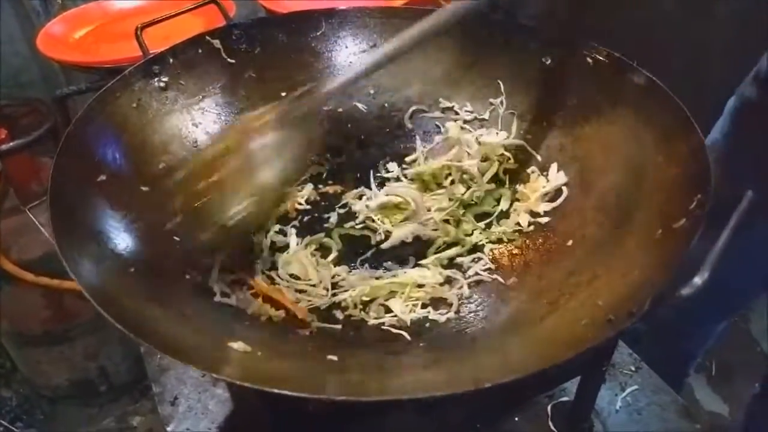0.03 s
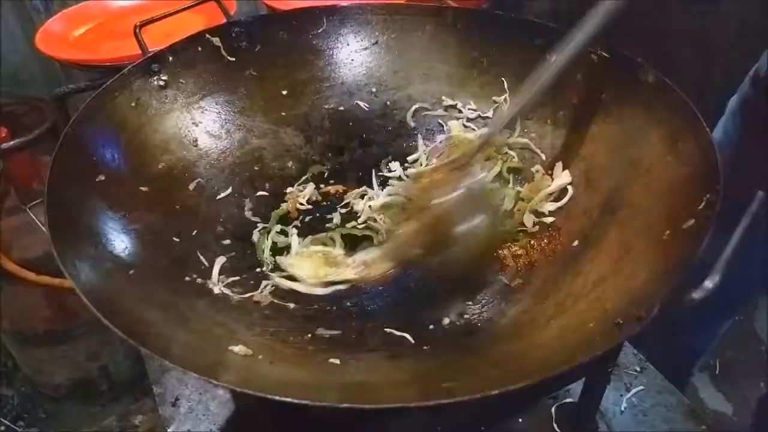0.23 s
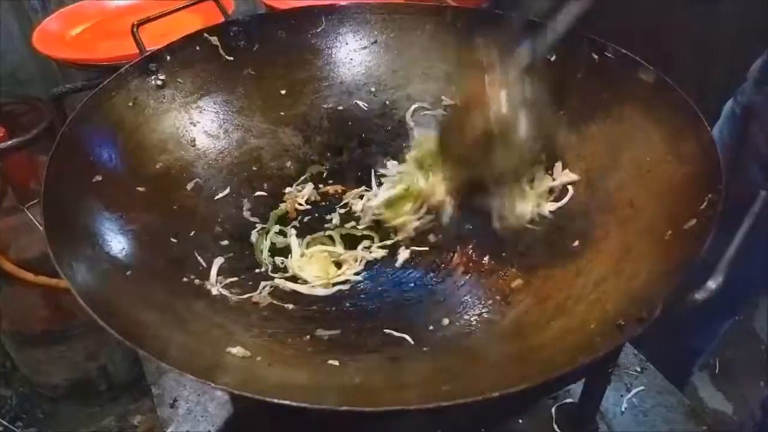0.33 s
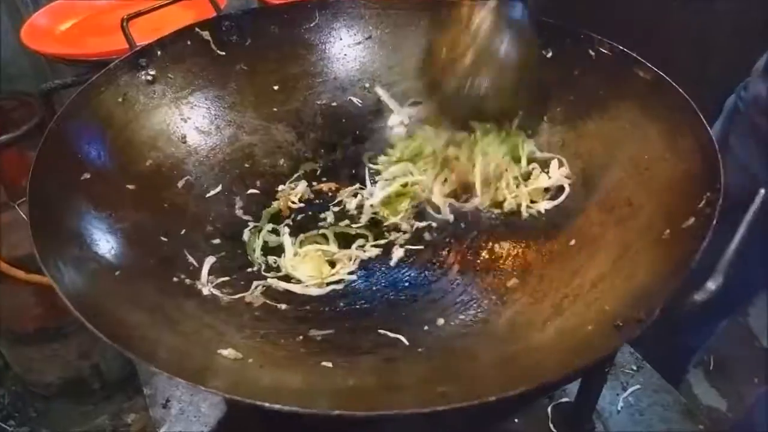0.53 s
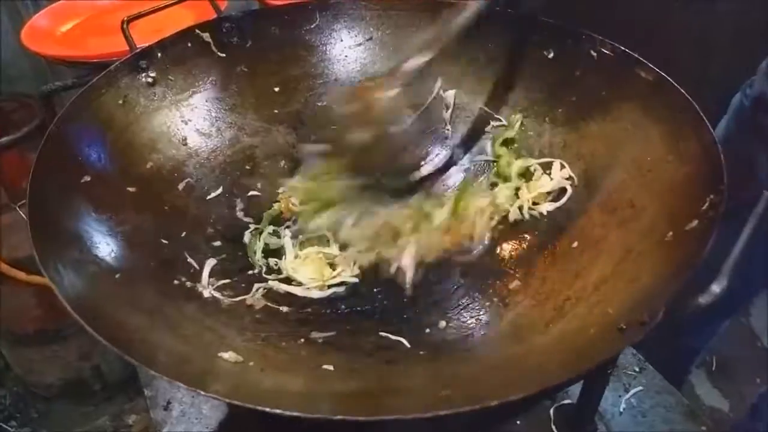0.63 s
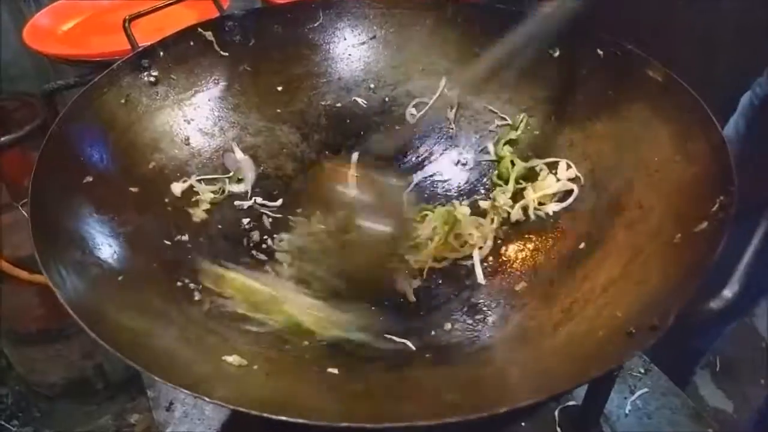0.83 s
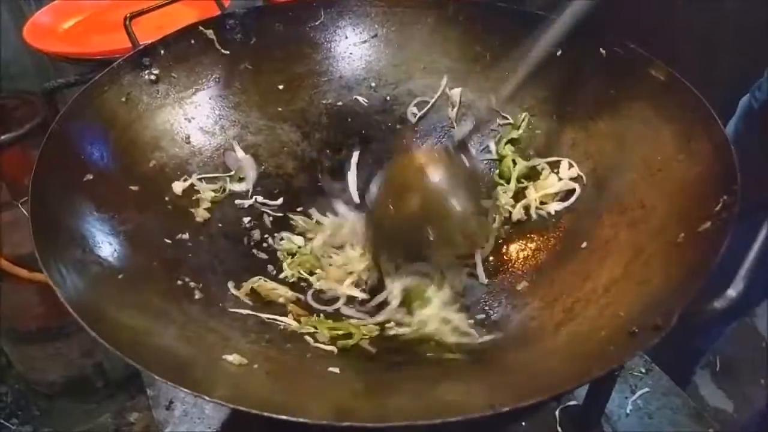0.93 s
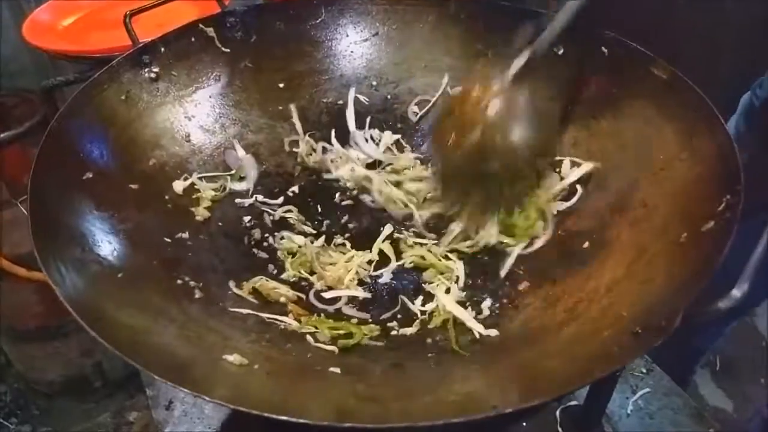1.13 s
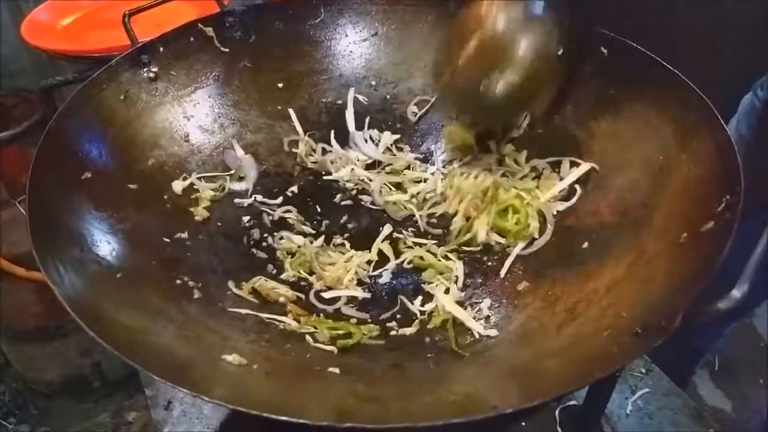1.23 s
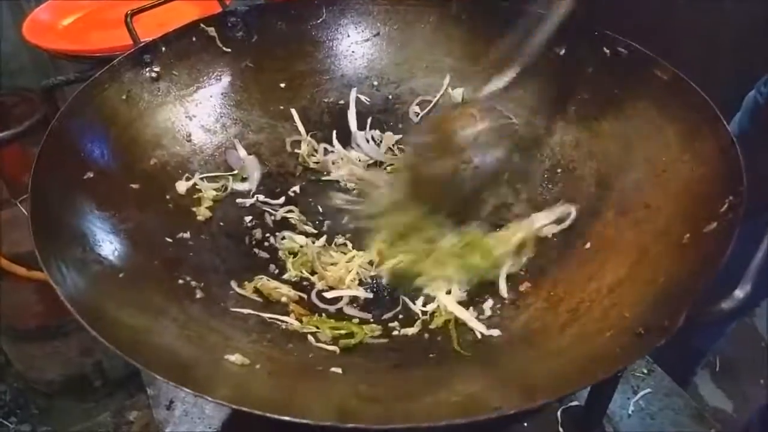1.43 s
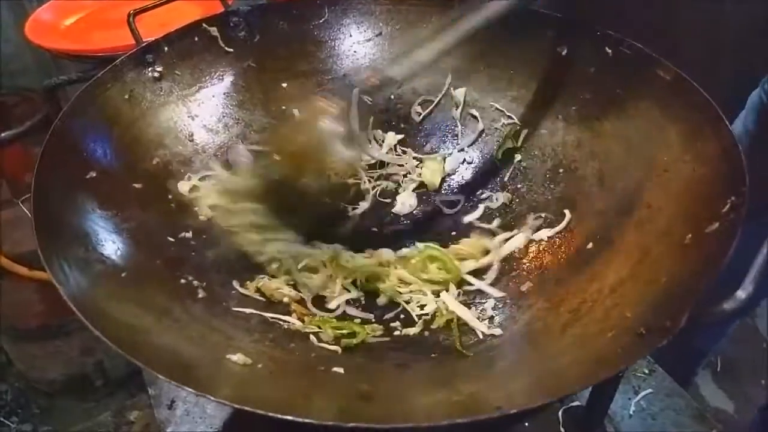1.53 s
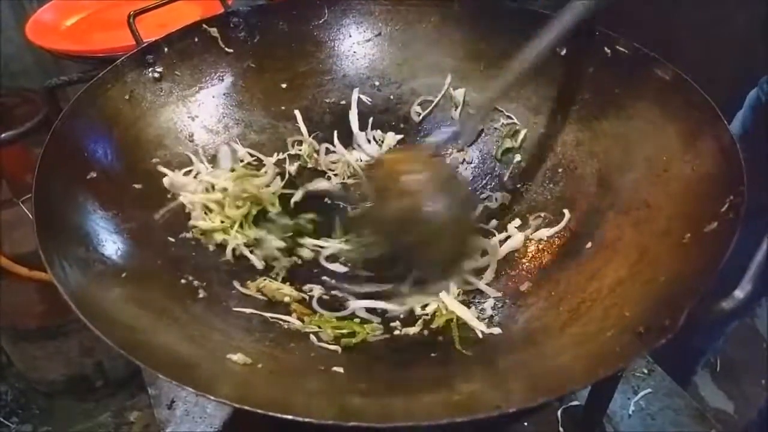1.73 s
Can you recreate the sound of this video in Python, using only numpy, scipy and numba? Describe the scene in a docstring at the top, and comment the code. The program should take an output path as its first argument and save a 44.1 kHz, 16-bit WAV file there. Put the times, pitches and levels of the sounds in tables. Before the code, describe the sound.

Vegetables sizzle in a steel wok over a rumbling gas burner. A metal ladle clatters, scrapes and squeaks against the pan, the hiss swells, then one hard knock briefly dips the volume before a last squeaky scrape.

```python
"""At a kitchen stove, shredded vegetables sizzle in a steel wok over a roaring gas burner.
Tiny bursts of steam make the hiss, and a few drops of oil spit. A stirring ladle chatters, scrapes
and squeaks on the pan and sets it ringing. One hard knock makes the automatic volume control turn
everything down. A stereo-widening effect hollows out a few narrow bands of pitch in the centre."""
import sys
import numpy as np
from scipy import signal
from scipy.fft import rfft, irfft, next_fast_len
from scipy.io import wavfile
from scipy.ndimage import uniform_filter1d
from numba import njit

SR = 44100
rng = np.random.default_rng(int(sys.argv[2]) if len(sys.argv) > 2 else 0)


def unload_audio(sound):
    """Save the sound as a 16-bit wav file, at the path given as the first command line argument."""
    columns = np.transpose(np.atleast_2d(sound))
    # keep every value between -1 and 1, then stretch to whole-number steps
    steps = np.round(np.clip(columns, -1, 1) * 32767)
    wavfile.write(sys.argv[1], SR, steps.astype(np.int16))


N = 79380
T = np.arange(N) / SR
FFT_SIZE = next_fast_len(2 * N)
FREQS = np.fft.rfftfreq(FFT_SIZE, 1 / SR)

def gain(db):
    """Turn decibels into a number to multiply a sound by."""
    return 10 ** (np.asarray(db) / 20)

def normalise(x):
    """Scale a signal to an average power of 1."""
    return x / np.sqrt(np.mean(x ** 2))

def gain_over_time(table, column):
    """Join one column of levels into a smooth volume curve."""
    rows = np.array(table)
    return gain(np.interp(T, rows[:, 0], rows[:, column]))

def gain_over_pitch(points):
    """Join (pitch_hz, level_db) points into a filter curve."""
    hz, db = np.array(points).T
    return gain(np.interp(np.log(FREQS + 1), np.log(hz), db))

def apply_filter(x, curve):
    """Turn each pitch up or down as the curve says."""
    cepstrum = irfft(np.log(curve + 1e-6), FFT_SIZE)
    # folding this in half keeps the filter from ringing before a sound starts
    cepstrum[1:FFT_SIZE // 2] *= 2
    cepstrum[FFT_SIZE // 2 + 1:] = 0
    return irfft(rfft(x, FFT_SIZE) * np.exp(rfft(cepstrum)), FFT_SIZE)[..., :N]

def colour(x, points):
    """Change the tone of a noise but keep its power."""
    return apply_filter(x, normalise(gain_over_pitch(points)))

def wander(per_s):
    """A smooth random drift, typically between -1 and 1."""
    hold = int(SR / per_s)
    steps = np.repeat(rng.standard_normal(N // hold + 1), hold)
    return normalise(uniform_filter1d(uniform_filter1d(steps, hold), hold)[:N])

def clicks(per_s, spread_db):
    """Two channels of random clicks, uneven in size."""
    sizes = gain(spread_db * np.minimum(rng.exponential(size=N), 5))
    happens = rng.random(N) < per_s / SR
    return normalise(happens * sizes * rng.standard_normal((2, N)))

def burst(start_s, fade_s, first_click=0.16):
    """One click and its dying chatter, with the energy of 10 ms at full level."""
    x = clicks(per_s=9000, spread_db=1.4) * (T >= start_s) * np.exp(-np.abs(T - start_s) / fade_s)
    x /= np.linalg.norm(x, axis=1, keepdims=True) + 1e-12
    x[0, int(start_s * SR)] += first_click
    return x / np.linalg.norm(x, axis=1, keepdims=True) * np.sqrt(SR / 100)

@njit
def band_pass(x, hz, width_hz):
    """Keep only the sound near a pitch that may move."""
    y, band_state, low_state = np.empty(len(x)), 0., 0.
    for i in range(len(x)):
        tuning, damping = np.tan(np.pi * hz[i] / SR), width_hz / hz[i]
        band = (band_state + tuning * (x[i] - low_state)) / (1 + tuning * (tuning + damping))
        band_state = 2 * band - band_state
        low_state += 2 * tuning * band
        y[i] = damping * band
    return y

def cut_lows(x, hz):
    """Thin steel gives off little sound below its lowest notes."""
    return signal.sosfilt(signal.butter(4, hz, "high", fs=SR, output="sos"), x)

def fading_notes(notes):
    """Struck metal's notes each fall 60 dB in ring_s; .imag holds sine waves, .real cosines."""
    return sum(gain(db) * np.exp((2j * np.pi * hz - np.log(1000) / ring_s) * T)
               for hz, db, ring_s in notes)

def ring(force, notes):
    """Every push on the metal sets its notes ringing."""
    one_tap = cut_lows(fading_notes(notes).imag, hz=205)
    return signal.fftconvolve(force, one_tap[None] / np.linalg.norm(one_tap), axes=1)[:, :N]

def favour(force, hz, width_hz):
    """The spot the ladle touches brings out the bowl's notes near one pitch."""
    return np.array([band_pass(channel, np.full(N, float(hz)), float(width_hz)) for channel in force])

# Heat of the pan as food is pushed over it: time_s, sizzle_db, seethe_db
FRYING_LEVELS = [(0, -40, -43.5), (.3, -42, -43), (.36, -36, -42), (.47, -37, -43.5), (.53, -37.5, -42.5),
                 (.63, -39, -39), (.8, -32.5, -38), (.87, -37, -38), (.98, -36.5, -38), (1.05, -33.5, -38),
                 (1.12, -28.5, -37.5), (1.2, -29, -36.5), (1.25, -32.5, -37), (1.3, -29, -35),
                 (1.46, -30.5, -34.5), (1.8, -32.5, -39)]
# Tone of the high sizzle and of the low seething oil: pitch_hz, level_db
SIZZLE_TONE = [(800, -18), (2000, -5.5), (3000, -3.5), (3700, 4), (4500, 0), (5600, 3), (7000, 1),
               (8500, -1), (10000, -5), (11200, -7), (12500, -6)]
SEETHE_TONE = [(100, -12.5), (300, 1), (700, 1.5), (1100, 2), (1600, -4), (2200, -7), (3200, -3),
               (6000, -30.5)]
def frying():
    """Tiny steam bursts merge into a flickering hiss over seething oil."""
    pops_per_s, spread_db, hiss_db, flicker_db = 5000, 0.5, 2.5, 1.27
    sizzle = normalise(clicks(pops_per_s, spread_db) + gain(hiss_db) * rng.standard_normal((2, N)))
    sizzle *= gain_over_time(FRYING_LEVELS, column=1) * gain(flicker_db * wander(per_s=59.57))
    seethe = normalise(clicks(pops_per_s, spread_db) + rng.standard_normal((2, N)))
    seethe *= gain_over_time(FRYING_LEVELS, column=2)
    return colour(sizzle, SIZZLE_TONE) + colour(seethe, SEETHE_TONE)

# Strength of the flame's roar: time_s, level_db
FLAME_LEVELS = [(0, -41.5), (.55, -46), (.66, -38), (.87, -40.5), (1.0, -37), (1.15, -37), (1.29, -32.5),
                (1.39, -35), (1.45, -37), (1.8, -37.5)]
# Tone of the roar: pitch_hz, level_db
FLAME_TONE = [(20, -13.5), (40, -19), (80, -2.5), (130, -2), (180, 2.5), (260, -5.5), (450, -11.5),
              (1200, -26.5)]
def burner():
    """The gas flame rumbles and flutters under the pan."""
    rumble = colour(rng.standard_normal((2, N)), FLAME_TONE)
    flutter_db = 1.76 * wander(per_s=35.04)
    return rumble * gain_over_time(FLAME_LEVELS, column=1) * gain(flutter_db)

# Spitting drops of oil: start_s, level_db
OIL_SPITS = [(0.085, -37.5), (0.4756, -35), (1.7014, -25.5)]
# Tone of a spit: pitch_hz, level_db
SPIT_TONE = [(2500, -10), (5000, 3), (9000, -5), (12000, -3)]
def oil_spits():
    """Single drops of hot oil spit with a short, bright snap."""
    snaps = sum(gain(db) * burst(start_s, fade_s=0.0012) for start_s, db in OIL_SPITS)
    return colour(snaps, SPIT_TONE)

# High ring of the ladle and pan, also used by the scrapes: pitch_hz, level_db, ring_s
STEEL_NOTES = [(2948, -15, 0.25), (3124, -1, 0.21), (3240, -4, 0.2), (3344, -2.5, 0.15), (3500, -1, 0.1),
               (3680, -2, 0.18), (3690, -4, 0.092), (3806, 3, 0.075), (4160, -7, 0.11), (5750, -29, 0.059),
               (7340, -27, .06), (8398, -7, .064)]
# Low notes of the wok, muffled by food and stove, also used by the scrapes: pitch_hz, level_db, ring_s
BOWL_NOTES = [(279, -3, 0.047), (387, -11, 0.12), (453, -7, 0.063), (578, -3.5, 0.046), (684.7, -1, 0.073),
              (1092, 0.5, 0.041), (1430, -16, 0.034)]
# Tone of the noise where metal meets metal: pitch_hz, level_db
CONTACT_TONE = [(200, -27), (600, -1.5), (1500, -10.5), (2600, -14), (3100, 12.5), (3900, 8.5), (4500, 6),
                (6200, 5.5), (8600, -1.5), (10000, -3), (12500, -6.5)]
# Ladle landings: start_s, steel_db, bowl_db, contact_db, chatter_fade_s, bowl_pitch_hz
LADLE_BLOWS = [(0.2127, -19.5, -23, -16.5, 0.017, 664), (.272, -34.5, -29.5, -53, 0.018, 380),
               (0.3203, -43, -53, -39, 0.0015, 680), (.4205, -52, -36, -40, .004, 563),
               (0.4281, -33, -45, -35, .005, 680), (0.6352, -41, -50, -35, .008, 680),
               (0.8871, -44, -26, -20.5, 0.034, 410), (1.4751, -18, -15, -18.5, 0.0086, 890),
               (1.52, -34, -22, -44, 0.0058, 560), (1.552, -20, -27.5, -32, 0.021, 430),
               (1.587, -38, -30.5, -29, 0.0024, 600)]
def ladle_blows():
    """The ladle lands and chatters, making a clatter, a high ring and a low note from the bowl."""
    steel = bowl = contact = 0
    for start_s, steel_db, bowl_db, contact_db, fade_s, bowl_hz in LADLE_BLOWS:
        push = burst(start_s, fade_s, first_click=0.78)
        steel += gain(steel_db) * push
        bowl += gain(bowl_db) * favour(push, bowl_hz, width_hz=560)
        contact += gain(contact_db) * burst(start_s, fade_s, first_click=0.44)
    return ring(steel, STEEL_NOTES) + ring(bowl, BOWL_NOTES) + colour(contact, CONTACT_TONE)

# Ladle strokes: start_s, length_s, steel_db, bowl_db, rasp_db, rasp_from_hz, rasp_to_hz, bowl_pitch_hz
LADLE_SCRAPES = [(0.309, 0.053, -42, -35, -39, 3380, 3420, 390),
                 (0.344, 0.062, -37.5, -26, -39.5, 3450, 2980, 428),
                 (0.636, 0.06, -62, -36.5, -49, 3350, 3000, 690),
                 (1.484, 0.032, -28, -39, -17, 3400, 3430, 450),
                 (1.555, 0.24, -40, -64, -36, 3060, 3190, 450)]
def ladle_scrapes():
    """The ladle's rim sticks and slips on the steel; its rasp glides as the touching point moves."""
    fade_in_s, fade_out_s, rasp_width_hz = 0.003, 0.022, 360.0
    steel = bowl = rasp = 0
    for start_s, length_s, steel_db, bowl_db, rasp_db, from_hz, to_hz, bowl_hz in LADLE_SCRAPES:
        end_s = start_s + length_s
        pressure = np.clip((T - start_s) / fade_in_s, 0, 1) * np.clip((end_s - T) / fade_out_s, 0, 1)
        slips = clicks(per_s=2500, spread_db=-1.5)
        glide_hz = np.interp(T, [start_s, end_s], [from_hz, to_hz])
        grating = np.array([band_pass(channel, glide_hz, rasp_width_hz) for channel in slips])
        rasp += gain(rasp_db) * pressure * normalise(grating)
        steel += gain(steel_db) * pressure * slips
        bowl += gain(bowl_db) * favour(pressure * slips, bowl_hz, width_hz=120)
    return ring(steel, STEEL_NOTES) + ring(bowl, BOWL_NOTES) + rasp

# Squeaks of the sliding ladle: start_s, length_s, level_db, from_hz, to_hz
LADLE_SQUEAKS = [(.347, .016, -29.5, 3650, 3590), (.36, 0.036, -31.5, 3250, 3105),
                 (0.427, .012, -24.5, 3023, 3040), (.436, .026, -35.5, 3220, 3235),
                 (1.59, 0.083, -31, 2975, 2945), (1.63, .15, -33, 3335, 3275)]
def ladle_squeaks():
    """Now and then the slipping locks into one thin, unsteady tone that swells and lets go."""
    pitch_wobble, roughness_db, side_db = 0.0034, 2.5, -5
    tone = 0
    for start_s, length_s, db, from_hz, to_hz in LADLE_SQUEAKS:
        progress = np.clip((T - start_s) / length_s, 0, 1)
        swell = np.sqrt(np.abs(np.sin(np.pi * progress)))
        hz = (from_hz + (to_hz - from_hz) * progress) * (1 + pitch_wobble * wander(per_s=300))
        level = gain(db + roughness_db * wander(per_s=250))
        tone += level * swell * np.exp(2j * np.pi * np.cumsum(hz) / SR)
    return np.array([tone.imag, gain(side_db) * tone.real])

# Short, dead notes of the knock: pitch_hz, level_db, ring_s
KNOCK_NOTES = [(710, -6.5, 0.011), (1070, -1.5, 0.0067), (1540, 3, 0.003), (3120, -2, 0.022),
               (7420, -4.5, 0.0021)]
# Faint, long notes of the pan's rim: pitch_hz, level_db, ring_s
RIM_NOTES = [(3260, 5, .5), (3360, -8, 0.79), (3467, -4, 0.25), (3470, -15, 0.86)]
def hard_knock():
    """The ladle hits the pan squarely: a very loud, dead clack, after which the rim sings faintly."""
    start_s, clack_db, rim_db, side_db = 1.4765, 15.5, -26.5, -9.5
    clack = cut_lows(fading_notes(KNOCK_NOTES), hz=467)
    clack /= np.abs(clack.imag).max()
    knock = gain(clack_db) * clack + gain(rim_db) * fading_notes(RIM_NOTES)
    knock = np.concatenate([np.zeros(int(start_s * SR)), knock])[:N]
    return np.array([knock.imag, gain(side_db) * knock.real])

# Narrow hollows in the mid channel: pitch_hz, width_hz, gain_db
MID_HOLLOWS = [(2290, 252, -33), (4710, 85, -14.5), (6960, 150, -4.5), (9290, 150, -12.5),
               (11580, 216, -9.5)]
# Stereo width, set by turning the side channel up or down: pitch_hz, gain_db
SIDE_TONE = [(60, -2), (600, -7), (900, -11), (1130, -28), (1550, 1.5), (2300, -1.5), (2950, 0),
             (3500, -16), (3900, -6.5), (4400, -38), (6000, -76), (12000, -59)]
# How much louder the left is than the right: pitch_hz, left_over_right_db
LEFT_LEAN = [(100, 6.5), (200, 5.5), (400, 4), (700, 2.3), (1150, 0), (2200, .4), (3150, 1.6), (4000, 0)]
def stereo_colour(mid, side):
    """A stereo-widening effect hollows out a few narrow bands in the centre; low sounds lean left."""
    hollows_db = sum(db * np.exp(-((FREQS - hz) / width_hz) ** 2) for hz, width_hz, db in MID_HOLLOWS)
    mid = apply_filter(mid, gain(hollows_db))
    side = apply_filter(side, gain_over_pitch(SIDE_TONE))
    lean = np.sqrt(gain_over_pitch(LEFT_LEAN))
    return np.array([apply_filter(mid + side, lean), apply_filter(mid - side, 1 / lean)])

def scene():
    """Add up the sounds as mid (what left and right share) and side (how they differ)."""
    cooking = frying() + burner() + oil_spits()
    ladle = ladle_blows() + ladle_scrapes() + ladle_squeaks() + hard_knock()
    mid, side = cooking + ladle
    return stereo_colour(mid, side)

def record(dry):
    """The volume drops on an overload and creeps back; peaks are clipped and the top treble is cut."""
    limit_db, recover_db_per_s, react_s, look_ahead_s, top_hz = -0.5, 15, 0.00082, 0.00069, 12600
    peak_db = 20 * np.log10(np.abs(dry).max(axis=0) + 1e-9)
    overload_db = np.maximum(peak_db - limit_db, 0)
    recovery_db = recover_db_per_s * T
    cut_db = np.maximum.accumulate(overload_db + recovery_db) - recovery_db
    cut_db = np.interp(T + look_ahead_s, T, cut_db)
    smoothing = np.exp(-1 / (react_s * SR))
    cut_db = signal.lfilter([1 - smoothing], [1, -smoothing], cut_db)
    clipped = np.clip(dry * gain(-cut_db), -1, 1)
    treble_cut = signal.ellip(10, .2, 70, top_hz, fs=SR, output="sos")
    return signal.sosfilt(treble_cut, clipped)

dry = scene()
out = record(dry)
unload_audio(out)
```